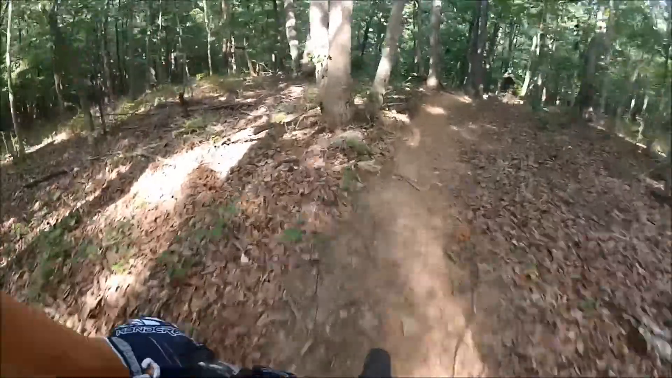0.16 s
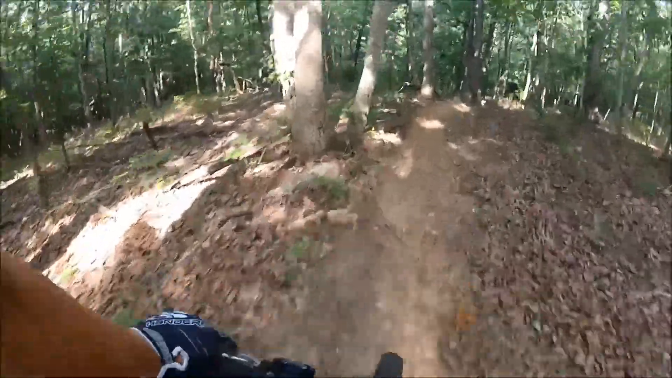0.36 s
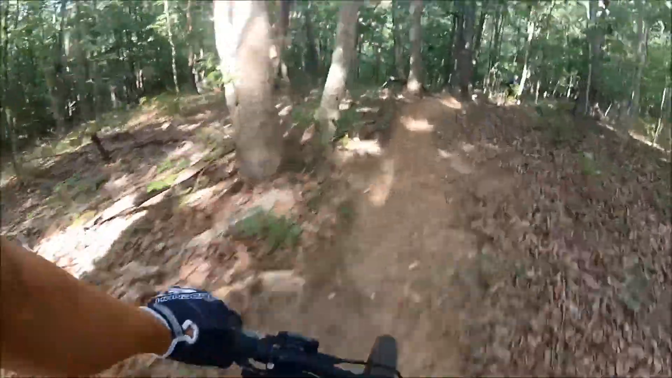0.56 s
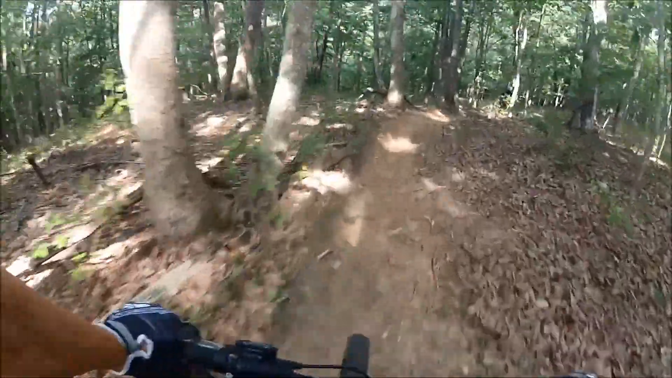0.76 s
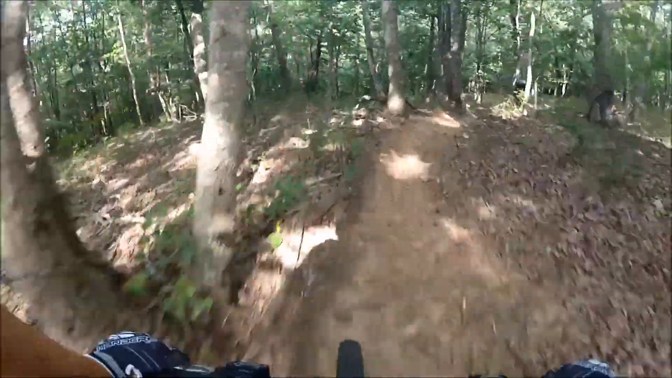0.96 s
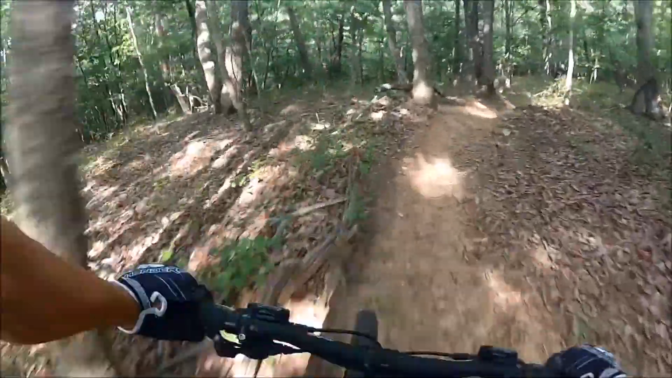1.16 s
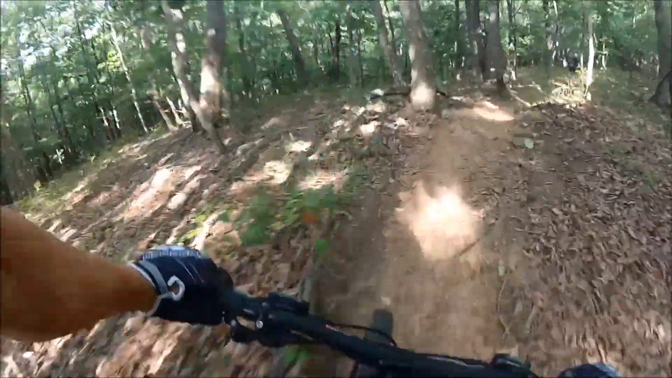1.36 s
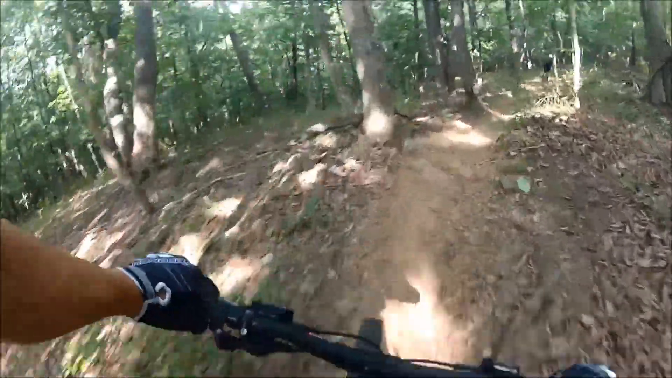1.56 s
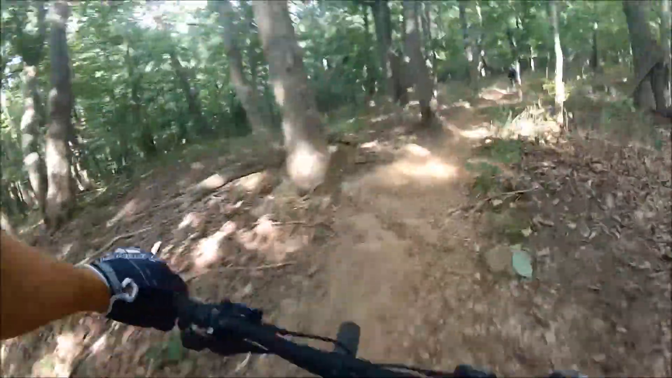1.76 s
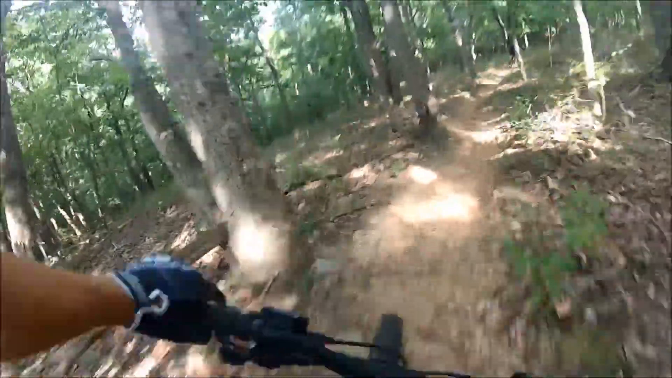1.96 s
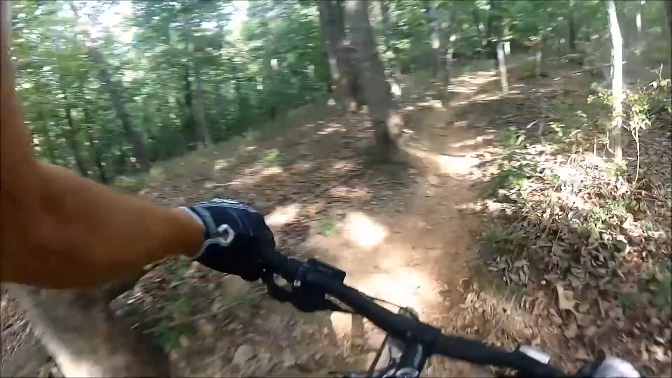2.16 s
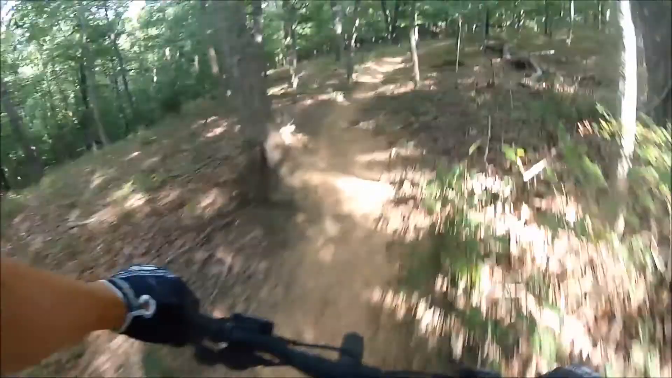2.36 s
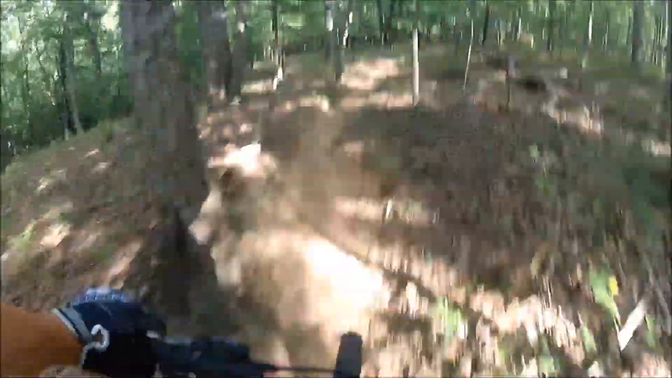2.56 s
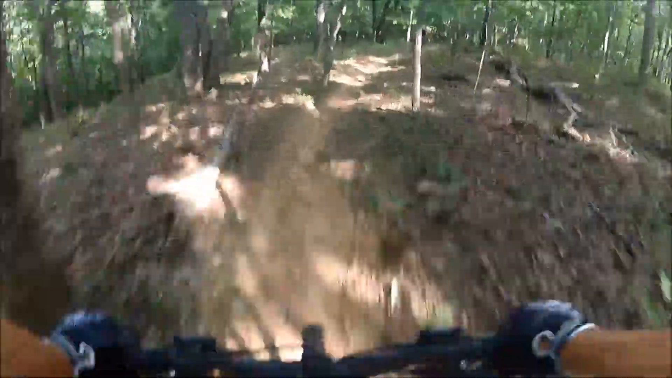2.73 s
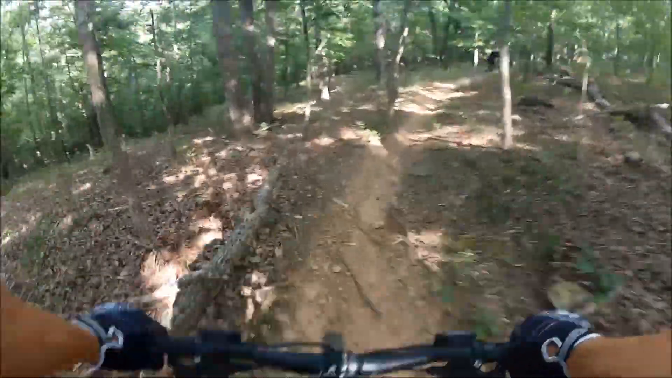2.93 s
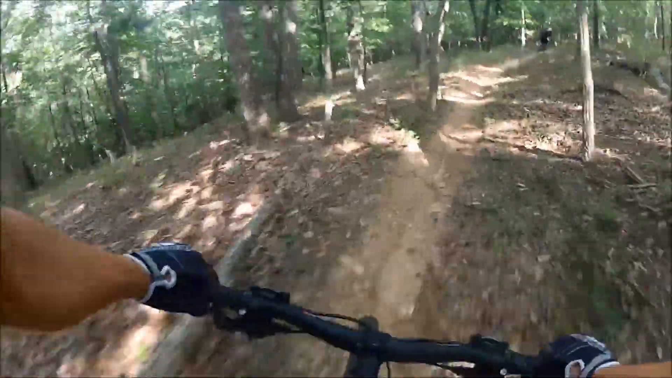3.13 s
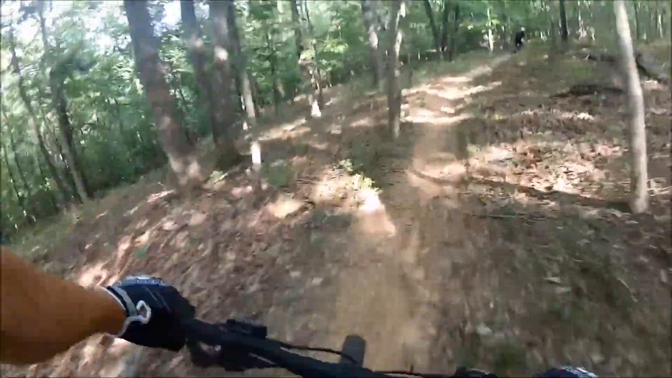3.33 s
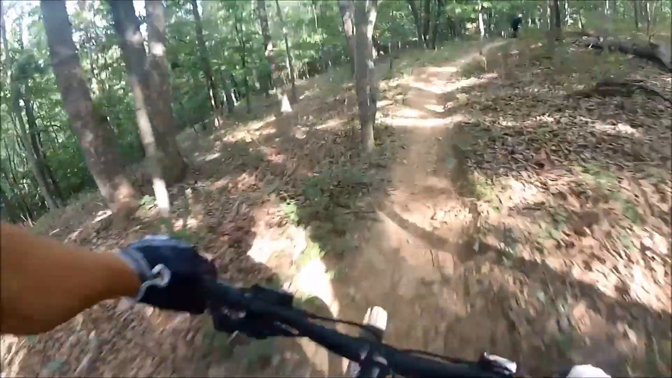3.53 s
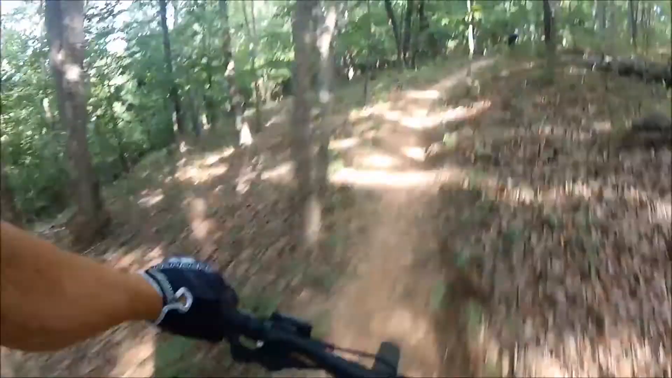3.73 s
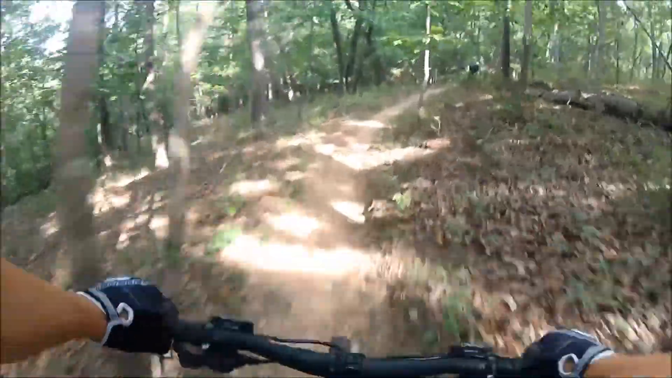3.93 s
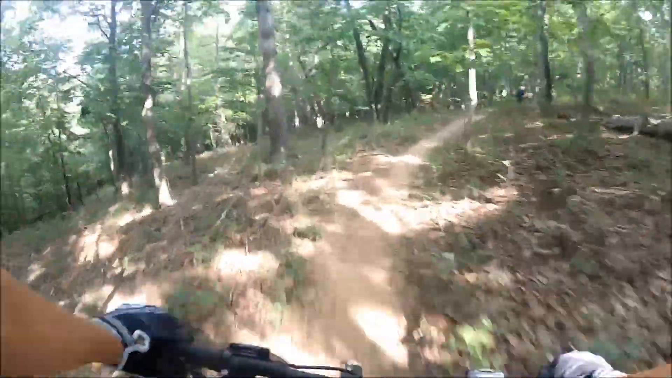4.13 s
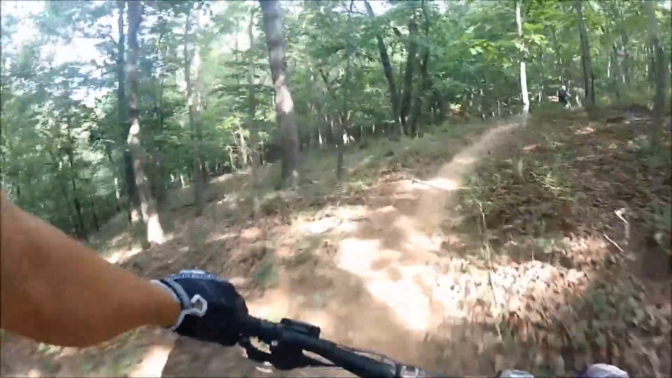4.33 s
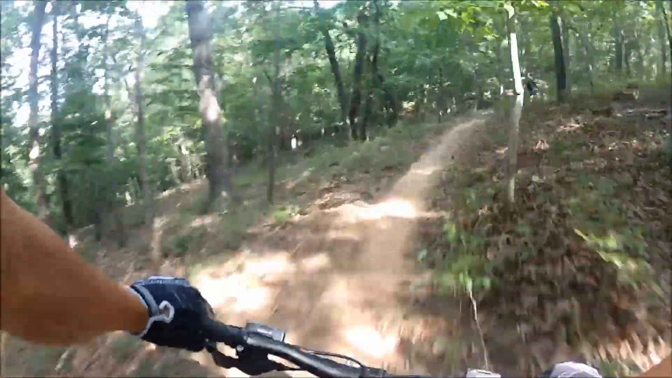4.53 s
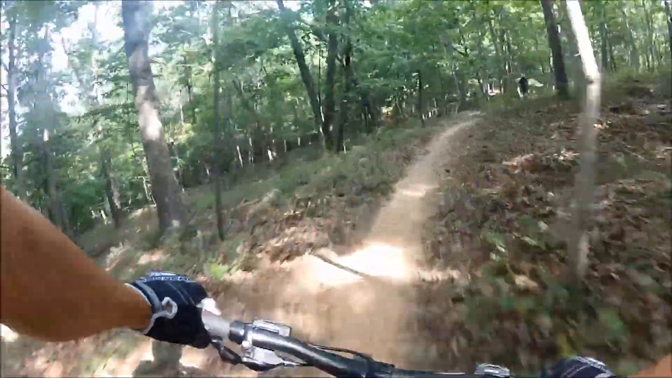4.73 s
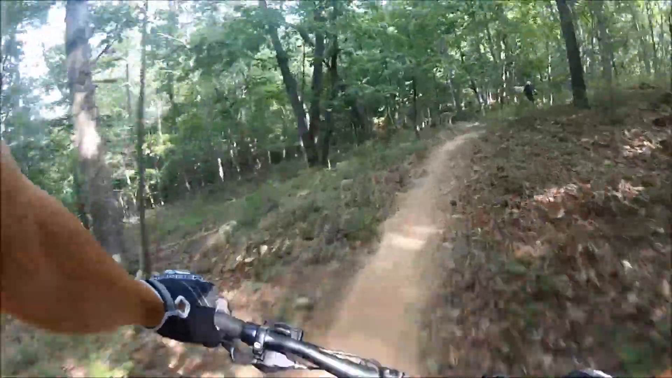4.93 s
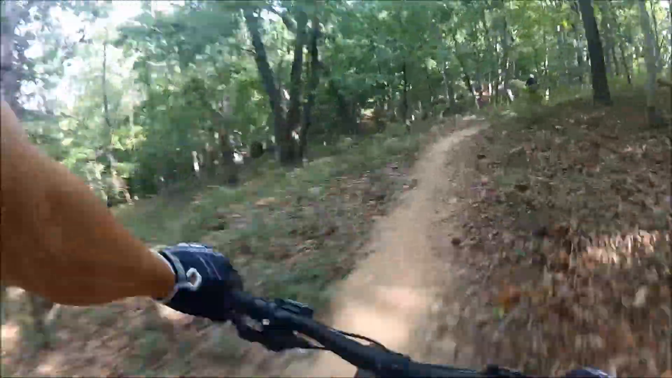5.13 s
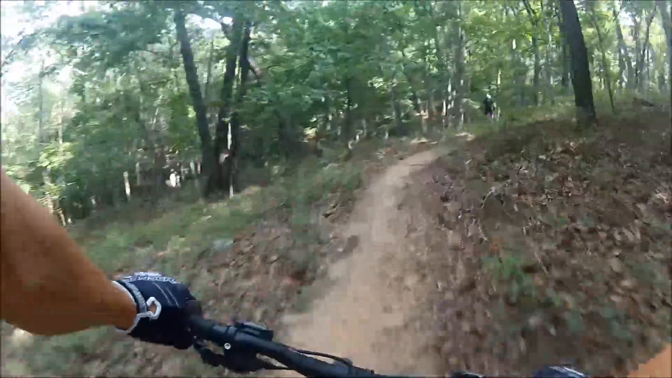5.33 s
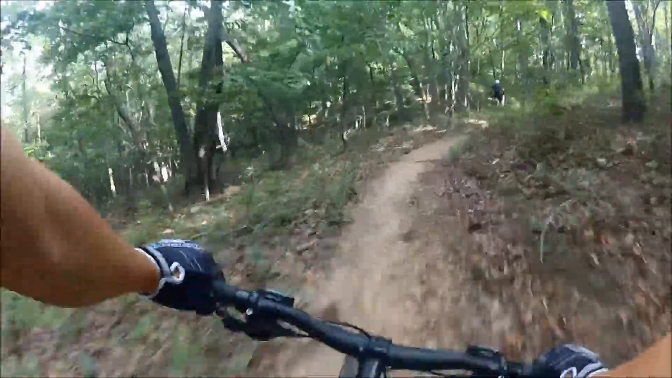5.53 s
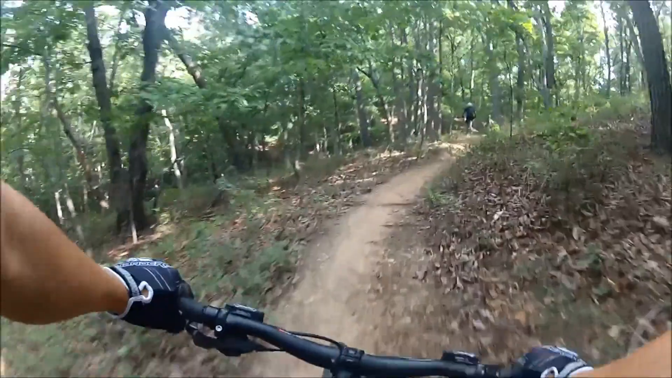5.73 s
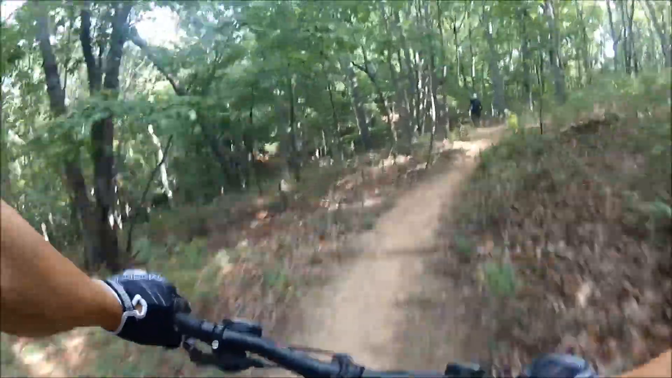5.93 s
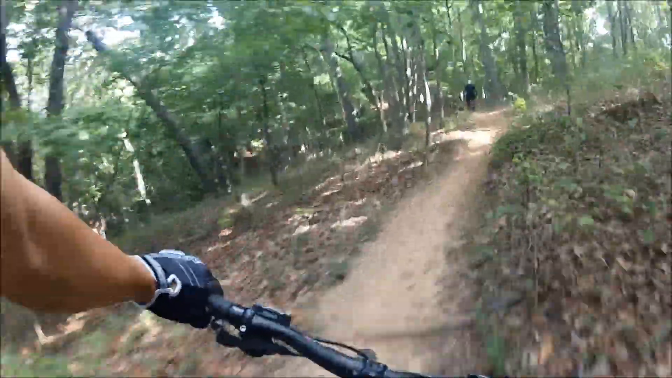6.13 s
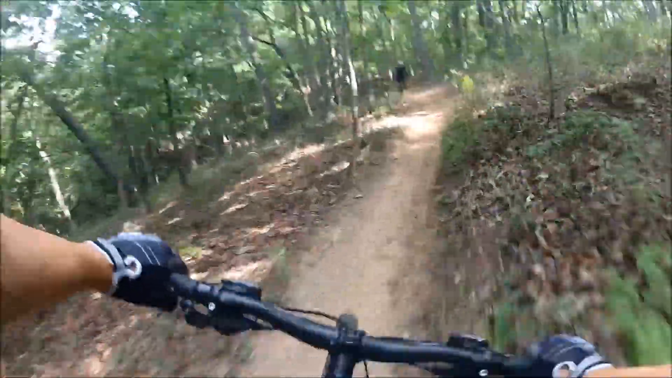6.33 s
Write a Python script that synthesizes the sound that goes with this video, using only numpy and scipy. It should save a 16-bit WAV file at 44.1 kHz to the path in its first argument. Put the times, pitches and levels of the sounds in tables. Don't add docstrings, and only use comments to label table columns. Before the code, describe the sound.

A mountain bike runs over a dirt forest trail, heard from inside a sealed plastic housing on the rider's chest: close, hollow, muffled, with a slightly harsh, gritty digital edge. Continuous grainy tyre crunch and low, uneven frame rumble lie under lumpy wind and harness thuds. It opens with scuffs, a leaf sweep and small taps; a firmer knock lands at 0.8 s, then clicks and twig snaps until 1.8. A heavy jolt at 1.95 leads to a dense volley of booming, cracking, rattling knocks from 2.2 to 2.4 s. Crunch and leaf hiss peak around 2.5, with more jolts at 2.9 to 3.3. From 3.5 the ride is steadier, the tread whirring faintly around 4.3, with sparse hard taps. Crunch thins near 5.1; dull scuffs gather around 5.9 to 6.1, and taps and a brief leaf swish close it near 6.4.

```python
import sys
import numpy as np
from scipy import signal
from scipy.io import wavfile
from scipy.ndimage import uniform_filter1d, map_coordinates

SR = 44100
rng = np.random.default_rng(int(sys.argv[2]) if len(sys.argv) > 2 else 0)


def boost(x):
    u = np.asarray(x, float) / 20
    return 10 ** u


def wav_out(sig):
    wavfile.write(sys.argv[1], SR, np.round(np.clip(np.atleast_2d(sig).T, -1, 1) * 32767).astype(np.int16))


N = 286209

# centre_hz, width_hz (of each of two stages)
RESONANCES = [(600, 300), (780, 200), (940, 170), (1100, 150), (1350, 230), (1640, 280), (1920, 270),
              (2280, 240), (2510, 220), (2760, 140), (2990, 240), (3210, 200), (3520, 200), (3670, 200),
              (3830, 200), (4250, 420)]
# start_s, case_db, mount_swing_db, crack_db
JOLTS = [(0.783, -23, -20.5, -53), (1.957, -17, -18.5, -36), (2.189, -14.5, -15.5, -40),
         (2.237, -28, -26.5, -54), (2.264, -15, -17, -63), (2.301, -27, -28, -50), (2.333, -18, -21.5, -49),
         (2.362, -29, -26, -55), (2.384, -12.5, -16, -41), (2.942, -21, -21, -66.5),
         (2.976, -49, -33.5, -51), (3.135, -23, -22, -58), (3.313, -34, -32, -58)]
# start_s, case_db, crack_db
TAPS = [(0.092, -40, -42), (0.102, -38, -42), (0.174, -42, -43), (0.762, -27.5, -32), (0.932, -36, -31),
        (1.193, -25, -30), (1.25, -38, -48), (1.315, -27, -31.5), (1.659, -25.5, -30), (2.105, -30.5, -45),
        (3.007, -34.5, -44), (3.413, -29.5, -41), (4.154, -32, -42), (4.325, -30.5, -36.5),
        (4.59, -30.5, -33), (4.774, -30.5, -37.5), (4.837, -37, -40.5), (5.108, -34, -46),
        (5.485, -30.5, -43.5), (5.74, -29.5, -39.5), (5.928, -37, -42.5), (6.029, -50, -46),
        (6.245, -32, -44.5), (6.292, -37.5, -44), (6.311, -29.5, -34), (6.33, -43, -45), (6.428, -33, -45)]


def tyres(crunch_db, hiss_db):
    lean_s, lean_width_s, lean_whirr_db, upright_whirr_db = 4.33, 1, 4.5, -0.5
    clumps = drift(30)
    middle_db, bright_db, dull_db = scuffing()
    born = rng.random(N) < 1500 * boost(3 * clumps) / SR
    sizes = boost(4.4 * np.minimum(rng.exponential(1, N), 5))
    grit = rms_one(born * sizes * rng.choice([-1, 1], N))
    grit = grit * boost(0.89 * middle_db)
    dealt = rng.integers(0, len(RESONANCES), N)
    rolling = boost(1.61 * clumps) * rng.standard_normal(N)

    lean = np.exp(-((np.arange(N) / SR - lean_s) / lean_width_s) ** 2)
    whirr = boost(upright_whirr_db + lean_whirr_db * lean)
    drives = []
    for k, (hz, _) in enumerate(RESONANCES):
        scuff_db = dull_db if hz < 1250 else middle_db
        level_db = 2.0 * drift(21.5) + 0.34 * drift(2.1) + 0.59 * scuff_db
        drive = boost(level_db) * (rolling + 0.1 * grit + 1.36 * grit * (dealt == k))
        drives.append(drive * whirr if 2200 < hz < 2600 else drive)

    leaves = boost(1.0 * drift(25)) * rms_one(band(rolling + 0.27 * grit, 4330, 5576))
    return boost(crunch_db + 16.5) * housing(drives) + boost(hiss_db + 2.5 + 0.58 * bright_db) * leaves


def scuffing():
    # start_s, length_s, gain_db (over the roll), bite (depth 0-2)
    scuffs = [(0.0, 0.014, 13, 0.99), (0.045, 0.075, 10, 0), (0.151, 0.043, 9, 1.1), (0.31, 0.084, 1.5, 0),
              (0.384, 0.034, 3.5, 0.58), (0.533, 0.055, 7, 1), (1.062, 0.017, 9.5, 0), (1.577, 0.041, 5, 0),
              (2.187, 0.053, 7.5, 1.4), (2.252, 0.061, 7.6, 1.8), (2.316, 0.039, 7, 1.2),
              (2.507, 0.019, 7.5, 0), (2.569, 0.059, 8, 0.93), (2.828, 0.025, 7, 0.75),
              (2.996, 0.061, 5.1, 1.7), (3.062, 0.017, 9, 0.25), (3.203, 0.033, 9, 1.1),
              (3.296, 0.036, 9.5, 1.5), (3.423, 0.09, 6.5, 1.3), (3.577, 0.022, 9.5, 1.02),
              (3.748, 0.019, 8, 0.88), (3.87, 0.024, 6.5, 0.88), (4.225, 0.0577, 4.1, 0.19),
              (5.561, 0.037, 7.5, 1.7), (5.81, 0.037, 6, 0), (5.937, 0.037, 7.5, 1.9),
              (6.0, 0.0379, 6, 1.7), (6.086, 0.056, 8, 1.75), (6.37, 0.029, 7.9, 2.1),
              (6.427, 0.039, 9.5, 1.4)]
    # start_s, length_s, gain_db (over the hiss)
    swishes = [
        (0.04, 0.163, 9),
        (3.96, 0.0405, 11),
        (6.1, 0.036, 7),
        (6.387, 0.036, 24),
    ]
    bright_share = 0.7
    extra_db = np.zeros((3, N))
    for s, length_s, db, bite in scuffs:
        span = slice(round(s * SR), round((s + length_s) * SR))
        extra_db[:, span] = db * np.array([[1], [bright_share], [bite]])
    for s, length_s, db in swishes:
        extra_db[1, round(s * SR):round((s + length_s) * SR)] += db
    return uniform_filter1d(extra_db, size=300, axis=1)


def housing(drives):
    strengths_db = [-7, -7.5, -3.5, -7.5, -9.5, -9.5, -2, -5, -6.5, -11, -15, -11.5, -7, -10.5, -12, -23]
    out = 0
    for k, (x, (hz, width_hz), db) in enumerate(zip(drives, RESONANCES, strengths_db)):
        out = out + (-1) ** k * boost(db) * resonance(resonance(x, hz, width_hz), hz, width_hz)
    return out


def snaps():
    # start_s, peak_db
    snap_rows = [(0.0503, -34), (0.7093, -40), (1.0615, -35), (1.1553, -36), (1.2121, -35.5), (1.4002, -40),
                 (1.4296, -35), (1.584, -34.5), (1.6906, -39), (1.7439, -37), (1.7958, -34), (1.9964, -32),
                 (2.295, -24.5), (2.3266, -34), (2.3825, -32.5), (2.5147, -30), (2.5808, -41),
                 (2.7087, -35), (2.829, -39), (3.0225, -38), (3.0759, -30.5), (3.2016, -38.5),
                 (3.249, -33.5), (3.3757, -32), (3.4745, -41), (3.5803, -35), (3.5997, -38),
                 (3.8761, -35.5), (4.0981, -40), (5.9349, -43.5)]
    pitch_hz, spread_hz, tap_click_db = 1920, 380, -4
    out = np.full(N, 1e-18)
    rows = snap_rows + [(s + 0.000974, crack_db + tap_click_db) for s, _, crack_db in TAPS]
    pitches_hz = pitch_hz + spread_hz * rng.uniform(-1, 1, len(rows))
    for (s, _), hz, burst in zip(rows, pitches_hz, bursts(rows, 0.011)):
        add(out, s, 0.16 * burst + resonance(burst, hz, 1730))
    return boost(15.5) * housing([out] * len(RESONANCES))


def ticks():
    # start_s, peak_db
    tick_rows = [(0.0508, -44), (0.1067, -50), (0.1506, -57), (0.273, -52), (1.1024, -59), (1.4286, -50),
                 (1.5853, -53.5), (1.9934, -57.5), (2.258, -43), (2.429, -44), (2.4857, -46.5),
                 (2.5456, -51), (2.581, -50), (2.6065, -46), (2.6718, -53), (2.7028, -52), (2.7442, -49),
                 (2.8557, -47.5), (3.0634, -52.5), (3.2695, -58), (3.3796, -47), (3.437, -44), (3.465, -49),
                 (3.978, -50.5), (4.0193, -55.5), (4.8609, -54.5), (6.3131, -50), (6.4413, -46.5)]
    out = np.full(N, 1e-18)
    for (s, _), burst in zip(tick_rows, bursts(tick_rows, 0.028, rise_s=0.00065)):
        add(out, s, burst)
    return boost(12.5) * band(out, 2300, 6100)


def knocks():
    jolt_signs = [-1, 1, -1, -1, 1, 1, -1, -1, 1, -1, -1, -1, 1]
    mount_hz, mount_t60_s, mount_rise_s = 102, 0.056, 0.0063
    case_hz, case_t60_s, case_rise_s = 273, 0.042, 0.0021
    out, split = np.zeros(N), crack()
    spots = 1 + 0.04 * rng.standard_normal((len(JOLTS), 2))
    for (s, case_db, mount_db, crack_db), sign, spot in zip(JOLTS, jolt_signs, spots):
        swing = mode(mount_hz * spot[0], mount_t60_s, mount_rise_s)
        ring = mode(case_hz * spot[1], case_t60_s, case_rise_s)
        add(out, s, sign * (boost(mount_db + 7.5) * swing + boost(case_db + 0.5) * ring))
        add(out, s, sign * boost(crack_db + 7.5) * split)

    nudge = mode(133.85, t60_s=0.049, rise_s=0.0035)
    rap = mode(263.6, t60_s=0.027, rise_s=0.001)
    for s, case_db, crack_db, swing_db in taps():
        add(out, s + 0.001346, -boost(crack_db + 4) * split)
        add(out, s + 0.0017, boost(swing_db + 5.5) * nudge - boost(case_db + 2.0) * rap)
    return out


def taps():
    # start_s, case_db, swing_db
    bumps = [(0.256, -37, -38.5), (0.324, -41.5, -38.5), (0.333, -55, -36.5), (0.385, -40, -47),
             (0.523, -39.5, -60), (0.6, -42.5, -57.5), (0.623, -39.5, -45), (0.891, -44.5, -39),
             (1.371, -31.5, -52), (1.515, -36, -39), (1.601, -35.5, -42), (1.723, -51, -36),
             (1.901, -58, -35), (2.475, -50, -53), (2.628, -44, -34.5), (2.789, -37.5, -42),
             (2.828, -34.5, -35), (3.651, -51, -38), (4.894, -38, -41), (4.973, -44, -40.5),
             (5.162, -31.5, -55), (5.388, -40, -60), (5.537, -40, -47), (5.703, -40, -38),
             (5.791, -42.5, -39), (5.887, -32.5, -51), (5.963, -48, -38), (5.983, -47, -41),
             (6.233, -41, -38), (6.373, -35.5, -42)]
    hard = [(s, case_db, crack_db, crack_db) for s, case_db, crack_db in TAPS]
    soft = [(s, case_db, case_db - 19, swing_db) for s, case_db, swing_db in bumps]
    return hard + soft


def mode(hz, t60_s, rise_s):
    t = np.arange(round(0.12 * SR)) / SR
    swing = (1 - np.exp(-(t / rise_s) ** 2)) * boost(-60 * t / t60_s) * np.sin(2 * np.pi * hz * t)
    return swing / np.max(np.abs(swing))


def crack(start_hz=2300, end_hz=420, fall_s=0.000731, peak_s=0.0013):
    t = np.arange(round(0.02 * SR)) / SR
    turns = end_hz * t + (start_hz - end_hz) * fall_s * (1 - np.exp(-t / fall_s))
    envelope = (t / peak_s * np.exp(1 - t / peak_s)) ** 1.34
    return -envelope * np.sin(2 * np.pi * turns)


def rattle():
    out = np.full(N, 1e-18)
    rows = [(s, crack_db + 1.5) for s, _, _, crack_db in JOLTS]
    rows += [(s, crack_db - 13) for s, _, crack_db, _ in taps()]
    for (s, _), burst in zip(rows, bursts(rows, 0.058)):
        add(out, s + 0.00151, burst)
    return boost(16.0) * band(out, 350, 1170)


def rumble(level_db):
    # centre_hz, level_db (per Hz)
    spectrum = [(35, -35), (60, 1), (145, 1), (226, -8), (295, -7), (378, -12.5), (509, -20.5), (700, -29),
                (910, -52), (1540, -120)]
    sizes = boost(4.8 * np.minimum(rng.exponential(1, N), 4))
    bumps = (rng.random(N) < 90 / SR) * sizes * rng.choice([-1, 1], N)
    drive = rms_one(bumps) * 0.26 + rng.standard_normal((2, N))
    hz, db = np.transpose(spectrum)
    edges_hz = 65 * 2 ** np.arange(0, 4, 0.5)
    out = 0
    for k, (low_hz, high_hz) in enumerate(zip(edges_hz, edges_hz[1:])):
        band_db = np.interp(np.log(low_hz * high_hz) / 2, np.log(hz), db)
        out = out + boost(band_db) * band(drive[k % 2], low_hz, high_hz)
    return boost(level_db + 0.5 + 1.4 * drift(42)) * rms_one(out)


def wind(level_db):
    noise = band(band(rng.standard_normal(N), 10, 60), 6.6, 37)
    lumps = np.sqrt(uniform_filter1d(noise ** 2, size=4000))
    return boost(level_db - 1.5) * noise / (lumps + 0.37 * np.mean(lumps))


def heaving():
    # top_s, level_db, sink_s (per 10 dB)
    heaves = [(0.0, -29, 0.1), (0.16, -38, 1.8), (0.38, -36, 0.2), (0.52, -38, 1), (0.78, -39, 1),
              (1.28, -35.5, 0.33), (1.45, -35.5, 0.15), (1.75, -34, 0.08), (1.97, -41, 0.6),
              (2.28, -25, .05), (2.39, -22, .05), (2.65, -31.5, 0.18), (2.73, -25.5, 0.05),
              (2.95, -32, .09), (3.13, -32.5, 0.08), (3.34, -28.5, 0.1), (3.56, -36, 0.16),
              (3.85, -38, 0.36), (4.12, -42, 1.3), (4.28, -32.5, 0.03), (4.62, -34.5, .12),
              (4.79, -37.5, .15), (5.05, -30, 0.12), (5.28, -31, 0.02), (5.51, -37.5, 0.34),
              (5.67, -32, 0.1), (5.95, -35, .12), (6.07, -35, 0.11), (6.49, -36.5, 0.4)]
    t = np.arange(N) / SR
    level_db = np.full(N, -50.0)
    for s, db, sink_s in heaves:
        level_db = np.maximum(level_db, db - 10 * np.abs(t - s) / sink_s)
    return level_db


def rms_one(x):
    return x / np.sqrt(np.mean(x ** 2) + 1e-20)


def in_time(rows):
    s, *columns = np.transpose(rows)
    return [np.interp(np.arange(N) / SR, s, c) for c in columns]


def drift(rate_hz):
    r = np.exp(-80 * np.pi * rate_hz / SR)
    slow = signal.lfilter([1], [1, -2 * r, r * r], rng.standard_normal(N // 40 + 2002))[2000:]
    return np.interp(np.arange(N) / 40, np.arange(len(slow)), rms_one(slow))


def band(x, low_hz, high_hz):
    return signal.sosfilt(signal.butter(2, [low_hz, high_hz], "band", fs=SR, output="sos"), x)


def resonance(x, hz, width_hz):
    r = np.exp(-np.pi * width_hz / SR)
    poles = [1, -2 * r * np.cos(2 * np.pi * hz / SR), r * r]
    return (1 - r * r) / 2 * signal.lfilter([1, 0, -1], poles, x)


def bursts(rows, t60_s, rise_s=0.00023):
    t = np.arange(round(0.05 * SR)) / SR
    noise = rng.standard_normal((len(rows), len(t)))
    return noise * boost(np.array(rows)[:, 1:2] - 60 * t / t60_s) * (1 - np.exp(-t / rise_s))


def add(out, s, pulse):
    i = round(s * SR)
    out[i:i + len(pulse)] += pulse[:N - i]


def scene():
    # time_s, crunch_db (looseness), bumpy_db (extra frame shake)
    ride = [(0.0, -54, 5.5), (0.3, -56, -4), (0.8, -55.5, 0.5), (1.12, -57, -1), (1.55, -57, -0.5),
            (1.9, -52, 3), (2.15, -52, 4), (2.45, -48, 4), (2.85, -51.5, 4), (3.25, -55, 1.5),
            (3.52, -53.5, 1), (3.9, -55.5, 3.5), (4.35, -53.5, 1), (4.7, -54, -1), (5.12, -58.5, 1.5),
            (5.6, -55.5, 2.5), (6.08, -56, 0.5), (6.49, -57, 1.5)]
    crunch_db, bumpy_db = in_time(ride)
    loose_db = crunch_db + 55
    heave_db = heaving()
    shake_db = uniform_filter1d(heave_db, size=5000) - heave_db.mean()
    bite_db = scuffing()[2]
    frame = rumble(-48.5 + bumpy_db + 0.2 * bite_db + 0.34 * shake_db)
    ground = frame + tyres(crunch_db, hiss_db=-73 + 1.065 * loose_db) + snaps() + ticks()
    return (wind(heave_db) + ground + knocks() + rattle())[None]


def roll_off(x):
    return signal.sosfilt(signal.butter(12, 15680, fs=SR, output="sos"), x)


def record(dry):
    clock_hz, guard_hz, top_hz = 12000, 5860, 15300
    guarded = signal.sosfilt(signal.ellip(6, 0.5, 40, guard_hz, fs=SR, output="sos"), dry[0])
    instants = np.arange(N * clock_hz // SR + 2) * SR / clock_hz
    slow = map_coordinates(guarded, [instants], order=3, mode="nearest")
    held = signal.resample_poly(np.repeat(slow, 4), SR, 4 * clock_hz)[None, :N]
    cut = signal.sosfilt(signal.ellip(10, 0.5, 70, top_hz, fs=SR, output="sos"), held)
    return roll_off(cut)


dry = scene()
out = record(dry)
wav_out(out)
```